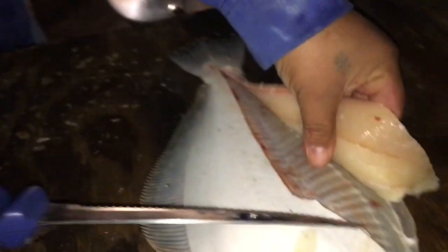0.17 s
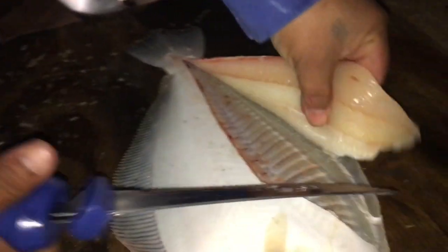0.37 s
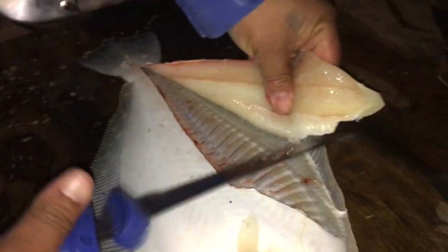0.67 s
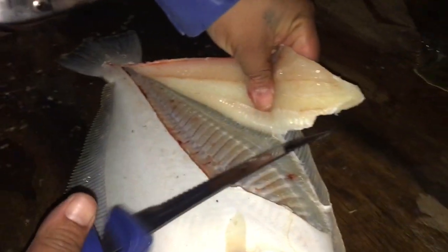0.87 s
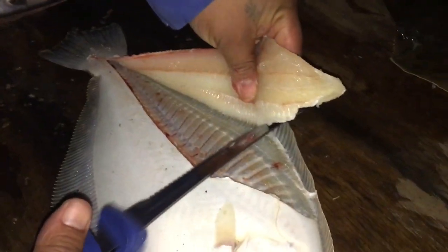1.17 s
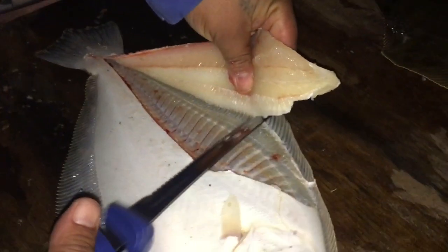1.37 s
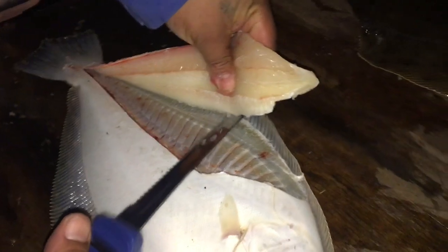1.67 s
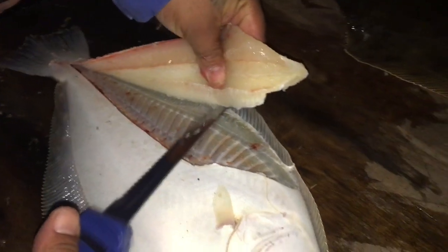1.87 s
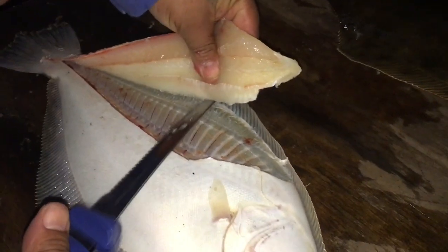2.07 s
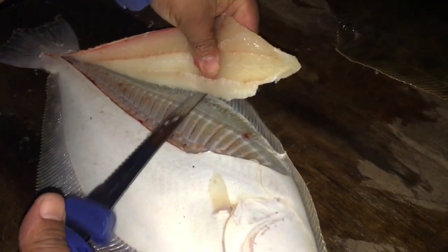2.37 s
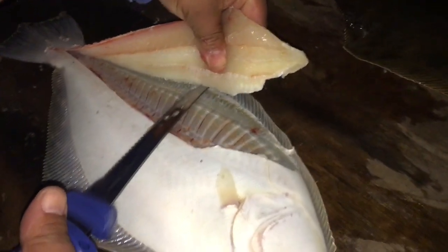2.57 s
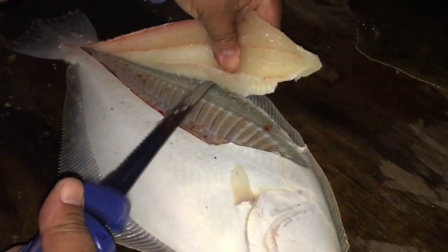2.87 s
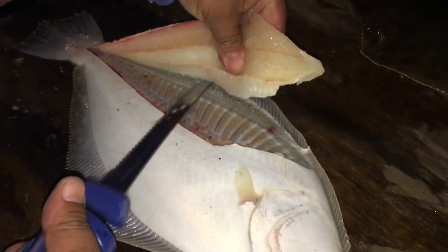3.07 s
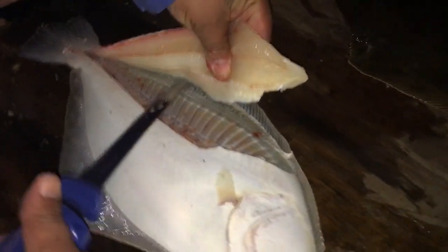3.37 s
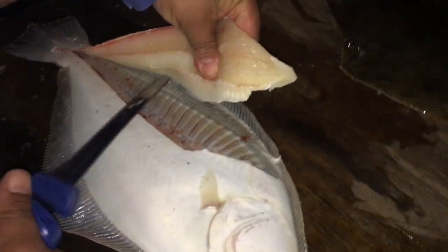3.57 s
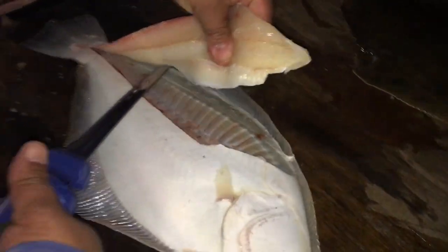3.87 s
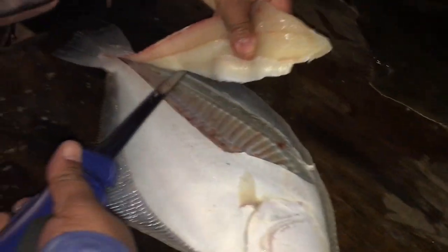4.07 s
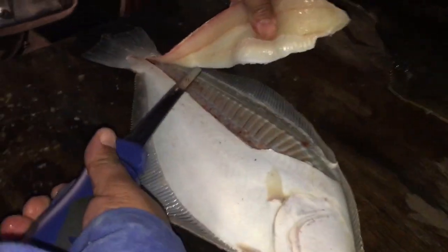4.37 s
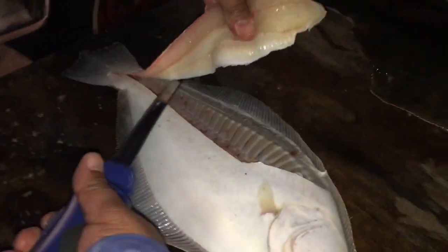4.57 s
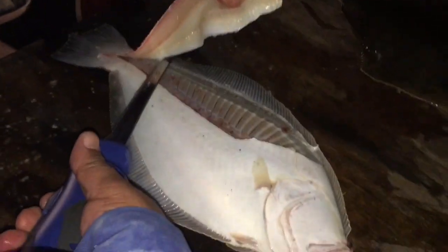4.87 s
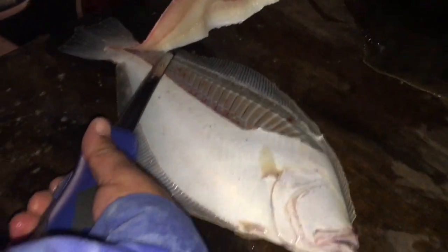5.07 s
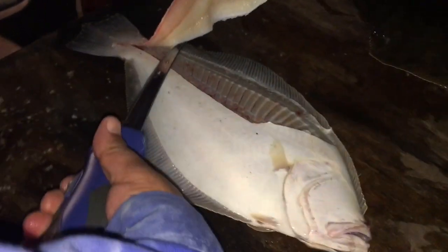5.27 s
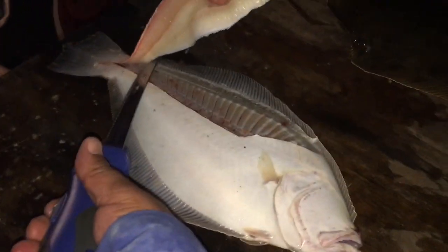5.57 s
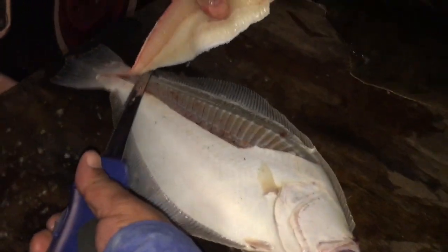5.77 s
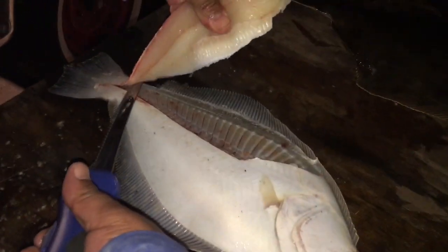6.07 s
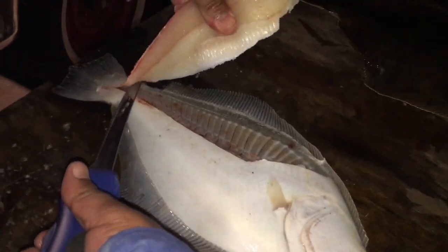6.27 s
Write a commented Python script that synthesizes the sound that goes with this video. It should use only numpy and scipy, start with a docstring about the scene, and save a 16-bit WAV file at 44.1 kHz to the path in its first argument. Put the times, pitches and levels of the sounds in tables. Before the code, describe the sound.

An electric fillet knife buzzes close by without a break, a fast, even knocking with steel blades rubbing and a thin motor whine. It first runs free with a few light clacks, then sinks into a flatfish, where the knocking grows and the rubbing dulls. The teeth tick on bones now and then and rasp through tougher tissue near the end. A faint, low outdoor rumble lies underneath.

```python
"""The fast, knocking buzz of an electric fillet knife, first free in the air, then slicing a flatfish.
A small whining motor drives a geared crank that shuttles two serrated blades about 34 times a second.
Each cycle the blades rub over each other and knock in their sockets at both reversals; under load the
knocks grow and the rubbing dulls. Now and then the teeth tick on a bone. A low outdoor rumble lies below."""
import sys
import numpy as np
from scipy import signal
from scipy.fft import rfft, irfft, next_fast_len
from scipy.io import wavfile
from scipy.ndimage import uniform_filter1d, map_coordinates

SR = 44100
rng = np.random.default_rng(int(sys.argv[2]) if len(sys.argv) > 2 else 0)


def transcribe(signal):
    """Save signal, clipped to [-1, 1], as a 16-bit WAV file at the path in sys.argv[1]."""
    frames = np.atleast_2d(signal).T
    limited = np.clip(frames, -1, 1)
    pcm = np.round(limited * 32767).astype(np.int16)
    wavfile.write(sys.argv[1], SR, pcm)


N = 283197
GEAR_RATIO = 3 / 25  # crank turns per shaft turn


# hardest knocks: start_s, relative_db
JOLTS = [(.139, -17), (.455, -14), (.6005, -10.5), (.631, -14), (.717, -12.5), (.891, -14), (.932, -14.5),
         (.947, -13), (1.005, -12), (1.063, -12), (1.192, -14), (1.209, -12.5), (1.457, -12.5),
         (1.587, -11.5), (1.6005, -12.5), (1.777, -12), (1.952, -11.5), (2.07, -12.5), (2.086, -12.5),
         (2.202, -10.5), (2.4525, -12.5), (2.481, -11.5), (2.512, -12.5), (2.526, -12.5), (2.748, -12.5),
         (2.9385, -13), (3.071, -11.5), (3.266, -12.5), (3.308, -12), (3.633, -12), (3.865, -12),
         (4.07, -13.5), (4.128, -11), (4.274, -10.5), (4.39, -11), (4.4495, -11.5), (4.478, -10),
         (4.566, -12.5), (4.902, -11.5), (5.323, -11.5), (5.379, -13.5), (5.496, -11.5), (5.758, -12.5),
         (5.787, -13.5), (5.877, -13.5), (6.183, -11.5), (6.21, -13)]
# spectra of housing, crank-pin click and grating socket: freq_hz, level_db
HOUSING_SPECTRUM = [(100, -27.5), (400, -26.5), (520, -16), (660, -1.5), (830, -4.5), (950, -1.5),
                    (1040, 2.5), (1160, 3), (1290, -0.5), (1540, -5.5), (1980, -5.5), (2400, -15),
                    (3500, -33), (6000, -33), (16000, -46)]
PIN_SPECTRUM = [(700, -21.5), (2000, -1), (3250, 1), (4400, 1), (6500, -8), (9000, -16), (16000, -23)]
SOCKET_SPECTRUM = [(500, -23.5), (2000, 5.5), (3200, 10.5), (4200, -0.5), (4900, -8), (5600, -13),
                   (6700, -1.5), (7400, -3.5), (9300, -3), (10500, -17), (16000, -34)]

def knocks(crank, load):
    """Socket play is taken up at each reversal; the soft blow rings the plastic housing."""
    out_turns = 0.345 + 0.035 * load + 0.045 * upright()
    out_at, out_size = strokes(crank, out_turns, jitter_turns=0.016, spread_db=1.1)
    back_turns = 0.81 + 0.1 * load + 0.012 * wobble(3)
    back_at, back_size = strokes(crank, back_turns, jitter_turns=0.018, spread_db=1.3)
    # unloaded, every other return lands harder
    back_size *= 1 + 0.33 * (1 - load[back_at]) * (-1) ** np.arange(len(back_at))
    back_size *= (cut_gain(base_db=-8, load_db=5.7, softening_db=-2.4) * hand_pressure())[back_at]
    # loaded, the return bounces once
    bounce_at = back_at + 0.00305 * SR * rng.uniform(0.6, 1.4, len(back_at))
    bounce_size = back_size * amp(-6) * load[back_at]
    out_size *= (cut_gain(base_db=-7.5, load_db=7.1, softening_db=-1.7) * hand_pressure())[out_at]
    at = np.r_[out_at, back_at, bounce_at]
    size = np.r_[out_size, back_size, bounce_size]
    # a jolt replaces any knock within 8 ms
    jolt_s, jolt_db = np.transpose(JOLTS)
    rise_s, grate_lead_s = 0.001478, 0.0018
    ordinary = np.abs(at[:, None] / SR - jolt_s).min(axis=1) > 0.008
    jolts = impulses((jolt_s + rise_s) * SR, amp(jolt_db + 14))
    taps = impulses(at, size * ordinary)
    # the tang grates home just ahead of the blow; jolts grate less
    samples = np.arange(N)
    sliding = np.interp(samples + round(grate_lead_s * SR), samples, taps + amp(-3) * jolts)
    # the crank pin taps before the out-stroke knock
    pin = load * impulses(*strokes(crank, 0.268 + 0.015 * upright(), jitter_turns=0.009, spread_db=1.5))
    grit = chatter(sliding, swell_s=0.0026, grain_db=2.5)
    force = amp(-0.7) * (taps + jolts) + amp(-11.5) * pin + amp(-7) * grit
    thud = coloured(force, HOUSING_SPECTRUM)
    click = coloured(chatter(pin, swell_s=0.00098, grain_db=5), PIN_SPECTRUM)
    grate = coloured(chatter(sliding, swell_s=0.0036, grain_db=6), SOCKET_SPECTRUM)
    return thud + amp(-9.5) * click + amp(-10.5) * grate


# steel on steel: time_s, rub_db, rasp_db, scrape_db
FRICTION_LEVELS = [(0, -32.5, -34.5, -55), (.45, -32.5, -32, -44), (1.12, -31.5, -32.5, -56),
                   (1.3, -35.5, -45, -37.5), (1.7, -35, -40.5, -41), (2.15, -40, -44, -52),
                   (2.55, -35, -39, -42), (3.3, -33, -49, -42), (3.75, -34.5, -48, -41),
                   (4.05, -35, -41, -43), (4.4, -42.5, -48, -39.5), (4.85, -41, -53, -37.5),
                   (5.1, -40, -36.5, -46), (5.4, -36.5, -57, -43), (5.7, -45, -47, -41.5),
                   (6.1, -39, -43, -38), (6.42, -43, -58, -47)]
# teeth in tough tissue: time_s, level_db
SAW_LEVELS = [(2.2, -70), (2.35, -47), (2.5, -41), (2.65, -50), (2.9, -70), (4.75, -70), (4.95, -38.5),
              (5.17, -36), (5.35, -35.5), (5.6, -58), (5.9, -54), (6.15, -47), (6.42, -35.5)]
# spectra of blade faces, teeth, tips and sawing: freq_hz, level_db
BLADE_SPECTRUM = [(400, -16.5), (700, -3.5), (2700, -2), (3200, -1.5), (3650, -3.5), (4150, -2.5),
                  (4900, -4.5), (5400, -0.5), (6700, -5.5), (7300, -7), (9400, -9.5), (10300, -10),
                  (13500, -13.5), (16000, -23)]
TEETH_SPECTRUM = [(500, -21), (1900, -1.5), (3300, 8), (4700, 5), (6600, 4), (8200, 2), (10000, 4.5),
                  (11500, -0.5), (13200, 0), (16000, 0)]
TIP_SPECTRUM = [(500, -21), (1900, 4.5), (3300, 5.5), (4700, -13.5), (6500, 3.5), (7500, -2), (9300, 4.5),
                (10300, -1), (12200, -4), (14000, -5), (16000, -12)]
SAW_SPECTRUM = [(1200, -28), (1700, -3), (1950, 9), (2150, 1), (2400, -3), (2850, 6), (3200, 6), (3700, -9),
                (4400, -1), (6000, -21), (12000, -37)]

def rubbing(crank, load):
    """Blades rub going out, rasp or saw coming back, then scrape their tips; load shifts each contact."""
    out_turns = 0.041 + 0.16 * load + 0.052 * upright()
    back_turns = 0.605 - 0.1 * load + 0.042 * upright()
    out = impulses(*strokes(crank, out_turns, jitter_turns=0.012, spread_db=1.2))
    back = impulses(*strokes(crank, back_turns, jitter_turns=0.0031, spread_db=2.5))
    end = impulses(*strokes(crank, 0.783 + 0.043 * load, jitter_turns=0.011, spread_db=3))
    rub = varied(coloured(chatter(out, swell_s=0.0042, grain_db=1.5), BLADE_SPECTRUM), patchy_db=0.9)
    rasp = varied(coloured(chatter(back, swell_s=0.0023, grain_db=0.5), TEETH_SPECTRUM), patchy_db=1.5)
    scrape = varied(coloured(chatter(end, swell_s=0.0025, grain_db=11), TIP_SPECTRUM), patchy_db=4)
    saw = unit(coloured(chatter(back, swell_s=0.0026, grain_db=3), SAW_SPECTRUM))
    rub_db, rasp_db, scrape_db = curves(FRICTION_LEVELS)
    saw_db = curves(SAW_LEVELS)[0]
    return amp(rub_db) * rub + amp(rasp_db) * rasp + amp(scrape_db) * scrape + amp(saw_db) * saw


# teeth striking bone: start_s, relative_db
BONE_TICKS = [(1.384, -15), (1.48, -16), (1.608, -14), (1.9797, -11), (2.9464, -11), (2.9767, -13),
              (3.0054, -13), (3.0644, -15.5), (3.1243, -18), (3.2126, -18), (3.242, -16), (3.302, -10.5),
              (3.3313, -14), (3.36, -11), (3.4205, -11), (3.685, -12.5), (3.715, -10.5), (3.8625, -11),
              (3.939, -16), (4.011, -17), (4.0395, -14), (4.0981, -19), (4.638, -13)]
# blade resonances: pitch_hz, width_hz, level_db
BLADE_MODES = [(2100, 360, -1), (4200, 350, -4.5), (6380, 370, 0.5), (7750, 1100, -5), (8400, 330, -1.5),
               (9040, 890, -8.5), (11000, 450, -6.5), (12200, 550, -8), (14400, 1100, -8.5)]

def bone_ticks():
    """A tooth snaps off a bone and the blade rings briefly, damped by flesh."""
    start_s, relative_db = np.transpose(BONE_TICKS)
    snaps = impulses(start_s * SR, amp(relative_db + 15))
    crack = chatter(snaps, swell_s=0.00065, grain_db=8)
    crunch = chatter(snaps, swell_s=0.0027, grain_db=3)
    force = amp(0.5) * snaps + amp(1) * crack + amp(-2.5) * crunch
    return filtered(force, lambda f: sum((-1) ** k * amp(db) * resonance(f, hz, width_hz)
                                         for k, (hz, width_hz, db) in enumerate(BLADE_MODES)))


# blade slaps: start_s, relative_db
BLADE_SLAPS = [(0.106, -16), (0.1355, -14), (.2219, -13), (.3506, -9), (0.3667, -11), (.3965, -11),
               (0.4253, -14), (0.699, -9), (0.7585, -14), (.7712, -14), (.8295, -11), (.857, -10),
               (0.8878, -17), (1.118, -14), (1.1922, -19)]

def clacks():
    """The loose blades slap together before the flesh holds them."""
    start_s, relative_db = np.transpose(BLADE_SLAPS)
    slaps = impulses(start_s * SR, amp(relative_db + 8.5))
    return coloured(chatter(slaps, swell_s=0.001, grain_db=7), TEETH_SPECTRUM)


# spectra of gear rattle and brush hiss: freq_hz, level_db
GEAR_SPECTRUM = [(150, -15.5), (450, -14.5), (540, -8), (660, 2.5), (900, -0.5), (1120, 1.5), (1500, 1),
                 (2000, 4), (2400, -6.5), (3200, -9.5), (6000, -71)]
BRUSH_SPECTRUM = [(1500, -35), (2500, 2.5), (3100, 1), (3650, 0), (4500, 3.5), (4900, -2), (5500, -1.5),
                  (6750, -1.5), (7300, -6.5), (9400, -6.5), (10300, -12), (11200, -7.5), (12400, -12.5),
                  (16000, -17)]

def gears_and_brushes(shaft, load):
    """Gear rattle and brush hiss flutter once a shaft turn and surge at each blade reversal."""
    flutter_db = 2 * np.sin(2 * np.pi * shaft)
    surge = np.cos(4 * np.pi * (GEAR_RATIO * shaft - 0.31 - 0.16 * load))
    meshing = rng.standard_normal(N) * amp(1.8 * wobble(900) + flutter_db + 1.5 * surge)
    rattle = unit(coloured(meshing, GEAR_SPECTRUM))
    hiss = unit(noise(BRUSH_SPECTRUM) * amp(2.76 * wobble(700) + flutter_db + 0.56 * surge))
    return (cut_gain(base_db=-31.5, load_db=-0.66, softening_db=-1.1) * rattle
            + cut_gain(base_db=-35.5, load_db=0.95, softening_db=-2) * hiss)


# steadier armature tones: shaft_order, relative_db
MOTOR_TONES = [(1, -59), (3, -51), (12, -58), (14, -57), (18, -56), (23, -57), (24, -52), (32, -59),
               (35, -63), (47, -62), (49, -62), (50, -60)]
# two swelling armature tones: time_s, low_db, high_db
SWELLING_TONES = [(0, -58, -48), (.35, -58, -47), (.5, -58, -55), (.9, -58, -53), (1.45, -56, -47),
                  (1.8, -54, -51), (2.3, -44, -53), (2.65, -43.5, -53), (2.9, -46, -54), (3.15, -51, -55),
                  (3.6, -46, -53), (3.95, -48, -52), (4.15, -54, -52), (5.25, -53, -54), (5.5, -53, -44),
                  (5.85, -54, -44), (6.05, -54, -49), (6.42, -54, -49)]
# spells of the top whistle: start_s, end_s, relative_db
WHISTLE_SPELLS = [(.22, .5, -50), (1.0, 1.14, -48), (1.36, 1.6, -47.5), (1.82, 2.48, -51),
                  (2.8, 3.14, -48.5), (3.42, 3.84, -49), (4.06, 4.28, -47.5), (4.44, 4.54, -50),
                  (5.46, 5.56, -47), (5.6, 5.86, -52), (6.0, 6.42, -52)]

def motor_whine(shaft):
    """Armature tones at multiples of the shaft speed waver with each stroke."""
    phase = 2 * np.pi * (shaft + 0.001 * wobble(30) + 0.0015 * np.sin(2 * np.pi * GEAR_RATIO * shaft))
    t = np.arange(N) / SR
    rest_db, fade_db_per_s = -59, 160
    spells_db = [db - fade_db_per_s * np.abs(t - np.clip(t, start_s, end_s))
                 for start_s, end_s, db in WHISTLE_SPELLS]
    whistle_db = np.maximum(np.max(spells_db, axis=0), rest_db)
    low_db, high_db = curves(SWELLING_TONES)
    tones = MOTOR_TONES + [(8, low_db), (16, high_db), (48, whistle_db)]
    return sum(amp(db + 1.5 + 1.8 * wobble(12)) * np.sin(order * phase + 0.18 * wobble(40))
               for order, db in tones)


# handle vibration: crank_order, base_db, load_db, softening_db
HANDLE_TONES = [(3, -68, 8, 11), (5, -54, -8.5, -3.5)]

def handle_shake(crank):
    """The shuttling blades shake the handle: a faint, unsteady hum."""
    return sum(cut_gain(*levels_db) * unit(np.sin(2 * np.pi * order * crank + 0.31 * wobble(4.22)))
               for order, *levels_db in HANDLE_TONES)


# knife set on the fish: start_s, level_db
BOARD_BUMPS = [(.61, -39), (0.699, -46), (.9, -45)]
# bump spectrum: freq_hz, level_db
BUMP_SPECTRUM = [(20, -18), (40, -7), (55, 6), (75, -10), (130, -20), (400, -62)]

def board_bumps(rise_s=0.023):
    """The board under the fish gives soft, low shudders."""
    envelope = np.zeros(N)
    for start_s, level_db in BOARD_BUMPS:
        age = np.maximum(np.arange(N) / SR - start_s, 0) / rise_s
        envelope += amp(level_db) * age * np.exp(1 - age)
    return envelope * noise(BUMP_SPECTRUM)


# outdoor rumble: time_s, level_db
RUMBLE_LEVELS = [(0, -44.5), (1.6, -48.5), (6.42, -49)]
# its spectrum: freq_hz, level_db
RUMBLE_SPECTRUM = [(12, -43), (20, -43), (48, -6), (70, 5.5), (97, -0.5), (130, -4.5), (214, -7), (249, -7),
                   (283, -5), (334, -8.5), (420, -9.5), (550, -34.5), (920, -120)]

def outdoor_rumble():
    """Low noise, drifting a little in level."""
    return amp(curves(RUMBLE_LEVELS)[0] + 0.26 * wobble(5.4)) * noise(RUMBLE_SPECTRUM)


def reflections(x, wet_db, t60_s, block=8192):
    """Board, hands and nearby things add a short, weak echo that changes as the knife moves."""
    t = np.arange(block) / SR
    blocks = np.pad(x, (0, -N % block)).reshape(-1, block)
    tails = rng.standard_normal(blocks.shape) * amp(-60 * t / t60_s) * (t > 0.002)
    tails /= np.linalg.norm(tails, axis=1, keepdims=True)
    echoes = signal.fftconvolve(blocks, tails, axes=1)
    at = block * np.arange(len(blocks))[:, None] + np.arange(echoes.shape[1])
    return x + amp(wet_db) * impulses(at.ravel(), echoes.ravel())


# knife travel: time_s, position_index
KNIFE_PATH = [(.36, 0), (.6, 1.5), (.76, 2), (.95, 2.5), (1.5, 2), (2.3, 2.5), (3, 2.5), (3.6, 3), (4.6, 3),
              (5.05, 4), (5.35, 4), (5.65, 5.5), (6.3, 5)]
# knife resonances at positions 0 to 5: pitch_hz, width_hz, gain_db
IN_AIR = [(637, 55, 3), (1090, 280, -3.5), (1630, 160, -5), (1982, 170, 1.5), (2400, 240, 4),
          (3960, 340, -5), (4680, 180, -1), (6600, 370, 7.5), (9800, 440, 2.5), (13200, 600, 5)]
ON_FISH = [(680, 100, 6), (1200, 220, -7), (1710, 190, 2), (2330, 200, -6), (2760, 170, 5), (3410, 150, 6),
           (3750, 200, -3), (4060, 120, 5), (4660, 350, 0)]
ENTERING_FLESH = [(675, 110, 4), (1170, 150, -3), (1470, 110, -2.5), (1710, 250, 3), (2070, 42, 5),
                  (2120, 220, -2.5), (3020, 180, -2), (3570, 280, -3), (4350, 430, 2.5), (4900, 190, 0)]
ALONG_RIBS = [(654, 150, 0.5), (846, 110, 1.5), (1545, 470, -5), (1910, 140, 2.5), (2890, 1100, -4.5),
              (4840, 200, -5), (8750, 800, 2), (10250, 500, -7), (12040, 1100, -6)]
AT_TAIL = [(477, 61, 3), (790, 170, 0.5), (1200, 300, -0.5), (1600, 220, -3.5), (2670, 330, -7),
           (3200, 370, 0.5), (4900, 430, -3), (7500, 600, -2.5), (10700, 3400, -3.5)]
AT_SKIN = [(480, 76, 6), (700, 180, -5), (1380, 200, 0), (1670, 180, -1.5), (1950, 330, -2),
           (2830, 250, -2), (3270, 200, 0.5), (4740, 470, -5), (7600, 600, -2), (10900, 2700, -4)]

def flesh_and_grip(x):
    """Flesh and grip lift or damp the knife's resonances, crossfading from position to position."""
    position = np.clip(curves(KNIFE_PATH)[0], 0, 5)
    mix = np.zeros(N)
    for index, modes in enumerate((IN_AIR, ON_FISH, ENTERING_FLESH, ALONG_RIBS, AT_TAIL, AT_SKIN)):
        shaped = filtered(x, lambda f: np.prod([1 + (amp(db) - 1) * resonance(f, hz, width_hz)
                                                for hz, width_hz, db in modes], axis=0))
        mix += np.clip(1 - np.abs(position - index), 0, 1) * shaped
    return mix


def upright():
    """How far the knife has turned upright near the tail, 0-1."""
    return np.clip(curves(KNIFE_PATH)[0] - 3, 0, 1)


# changes in the hand's lean: centre_s, half_width_s, gain_db
HAND_LEANS = [(1.5, .15, -1), (2.496, 0.045, 2), (4.623, 0.18, 1.5)]

def hand_pressure():
    """Knock gain wanders with the pressure of the hand."""
    t = np.arange(N) / SR
    lean_db = sum(db * np.exp(-((t - centre_s) / half_s) ** 2) for centre_s, half_s, db in HAND_LEANS)
    return amp(lean_db - 1.03 * wobble(4.74))


# pressure into the cut: time_s, load_fraction
CUT_LOAD = [(.8, 0.04), (1.1, 0.31), (1.35, 0.87), (1.8, 0.97), (4.85, 0.99), (5.1, 0.56), (5.45, 0.98),
            (6.42, 0.78)]
# softening of the knocks, rattle and hiss, with a lower handle hum: time_s, softening_fraction
SOFTENING = [(1.1, 0.5), (1.6, 0.1), (2.8, 0.12), (3.7, 0.3), (4.5, 0.4), (5.3, 0.86), (5.7, 0.63)]

def cut_gain(base_db, load_db, softening_db):
    """Gain of a part: its base level, shifted by the load and softening curves."""
    return amp(base_db + load_db * curves(CUT_LOAD)[0] + softening_db * curves(SOFTENING)[0])


def strokes(crank, angle_turns, jitter_turns, spread_db):
    """Sample index and strength of a contact made once a crank cycle."""
    cycle = np.arange(int(crank[-1] - angle_turns[-1]) + 1)
    slip, size = rng.standard_normal((len(cycle), 2)).T
    at = np.interp(cycle + jitter_turns * slip, crank - angle_turns, np.arange(N)).astype(int)
    return at, unit(amp(2 * spread_db * np.tanh(size / 2)))


def chatter(pushes, swell_s, grain_db):
    """Each push becomes a swelling, fading burst of micro-contacts of the same energy."""
    age = np.arange(SR // 20) / SR / swell_s
    envelope = np.minimum(age * 2, 1) / np.cosh(2 * (age - 1))
    grit = unit(rng.standard_normal(N) * amp(grain_db * np.tanh(wobble(2500))))
    return grit * signal.fftconvolve(pushes, envelope / np.linalg.norm(envelope))[:N]


def varied(x, patchy_db):
    """Each contact meets other teeth, so its colour differs a little; rms 1."""
    spectra = signal.stft(x, nperseg=256)[2]
    patches = uniform_filter1d(rng.standard_normal(spectra.shape), size=5, axis=0)
    patches = unit(uniform_filter1d(patches, size=6, axis=1))
    return unit(signal.istft(spectra * amp(patchy_db * patches), nperseg=256)[1][:N])


def coloured(x, spectrum, size=8192):
    """Pass x through a minimum-phase body of unit energy."""
    hz, db = np.transpose(spectrum)
    outline_db = np.interp(np.log(np.fft.rfftfreq(size, 1 / SR) + 1), np.log(hz), db)
    cepstrum = irfft(np.log(amp(outline_db)))
    cepstrum[1:size // 2] *= 2
    cepstrum[size // 2 + 1:] = 0
    ring = irfft(np.exp(rfft(cepstrum)))
    return signal.fftconvolve(x, ring / np.linalg.norm(ring))[:N]


def noise(spectrum):
    """Coloured noise of rms 1."""
    return unit(coloured(rng.standard_normal(N), spectrum))


def resonance(f, pitch_hz, width_hz):
    """Complex band-pass response of one mode."""
    return 1j * f * width_hz / (pitch_hz ** 2 - f ** 2 + 1j * f * width_hz)


def filtered(x, response):
    """Apply a complex frequency response."""
    size = next_fast_len(N + SR // 2)
    return irfft(rfft(x, size) * response(np.fft.rfftfreq(size, 1 / SR)), size)[:N]


def impulses(at, sizes):
    """Single pushes at the given samples."""
    return np.bincount(np.asarray(at, int), sizes, N)[:N]


def wobble(rate_hz):
    """Smooth random curve with knots at rate_hz."""
    knots = rng.standard_normal(int(N * rate_hz / SR) + 4)
    return map_coordinates(knots, [np.arange(N) * rate_hz / SR])


def curves(rows):
    """One value per sample for each column after time_s."""
    time_s, *columns = np.transpose(rows)
    return [np.interp(np.arange(N) / SR, time_s, column) for column in columns]


def amp(db):
    """Decibels to gain."""
    return 10 ** (np.asarray(db) / 20)


def unit(x):
    """Scale to rms 1."""
    return x / np.sqrt(np.mean(x ** 2) + 1e-20)


# motor speed, sagging in the cut: time_s, speed_hz
SHAFT_SPEED = [(0.0, 287.15), (0.4, 288.2), (0.9, 288.3), (1.05, 288.9), (1.25, 288), (1.33, 286.6),
               (1.6, 286.2), (1.8, 284.8), (2.05, 284.45), (2.12, 283.6), (2.8, 283.3), (3.02, 281.6),
               (3.25, 281.7), (4.0, 285.4), (4.14, 286.8), (4.6, 285.68), (4.8, 284.74), (5.2, 288.75),
               (5.6, 286.14), (6.42, 284.55)]

def scene():
    """The shaft turns the crank, and the crank times the strokes of the blades."""
    shaft = np.cumsum(curves(SHAFT_SPEED)[0]) / SR  # turns
    crank = GEAR_RATIO * shaft
    load = curves(CUT_LOAD)[0]
    blades = knocks(crank, load) + rubbing(crank, load) + clacks() + bone_ticks()
    blades = reflections(blades, wet_db=-11, t60_s=0.066)
    knife = flesh_and_grip(blades + gears_and_brushes(shaft, load))
    return (knife + motor_whine(shaft) + handle_shake(crank) + board_bumps() + outdoor_rumble())[None]


def record(dry):
    """Brick-wall low-pass."""
    cutoff_hz = 15950
    return filtered(dry[0], lambda hz: hz < cutoff_hz)[None]


dry = scene()
out = record(dry)
transcribe(out)
```